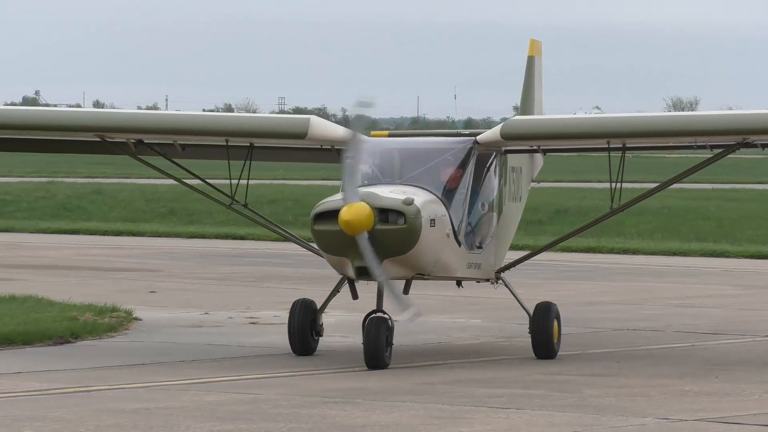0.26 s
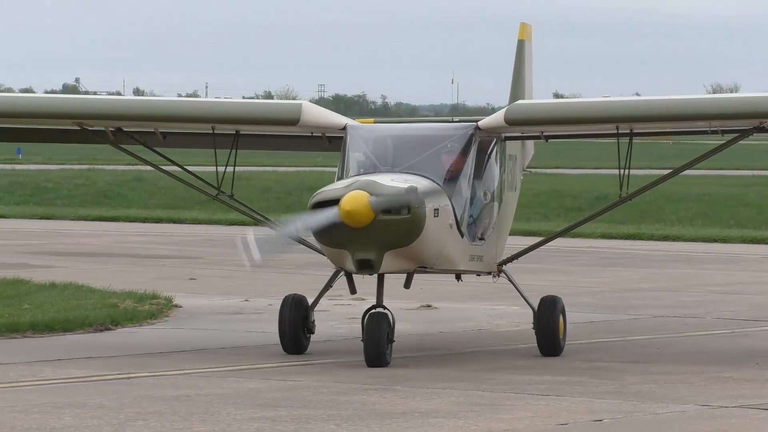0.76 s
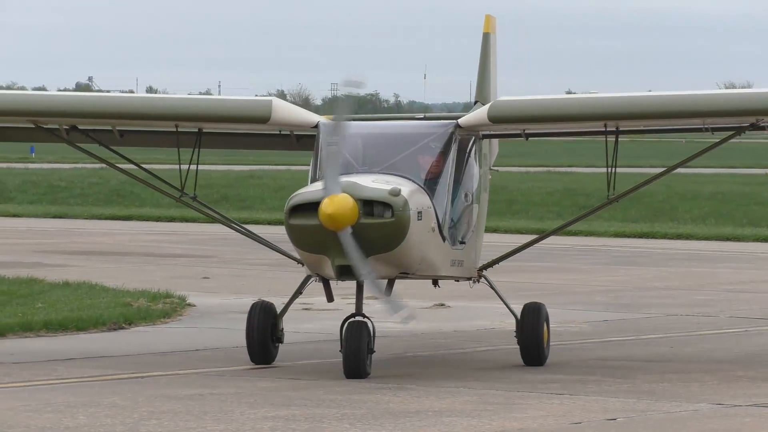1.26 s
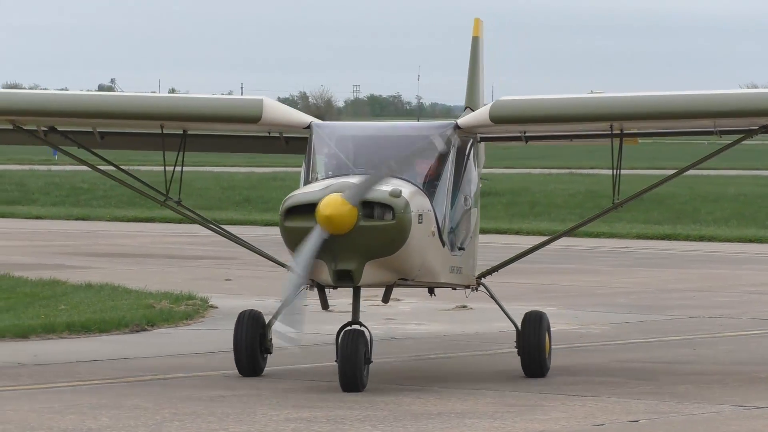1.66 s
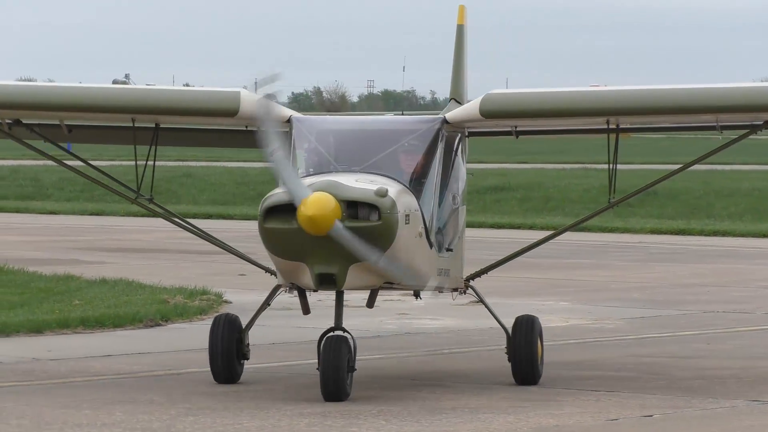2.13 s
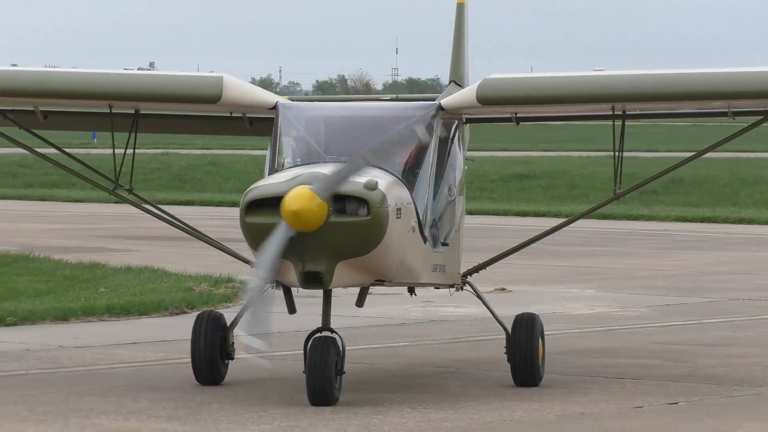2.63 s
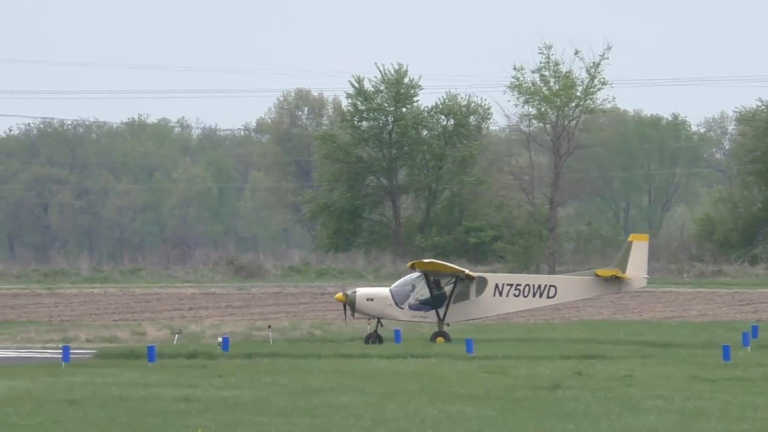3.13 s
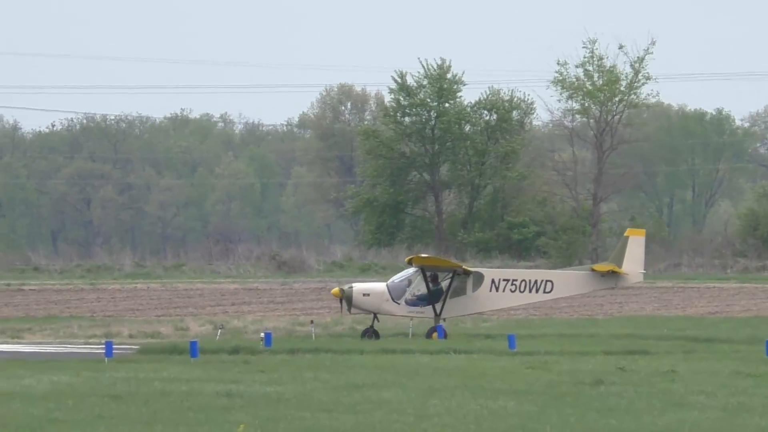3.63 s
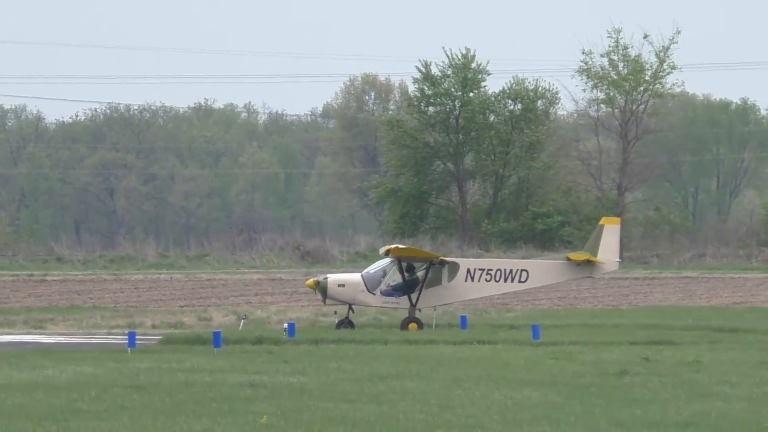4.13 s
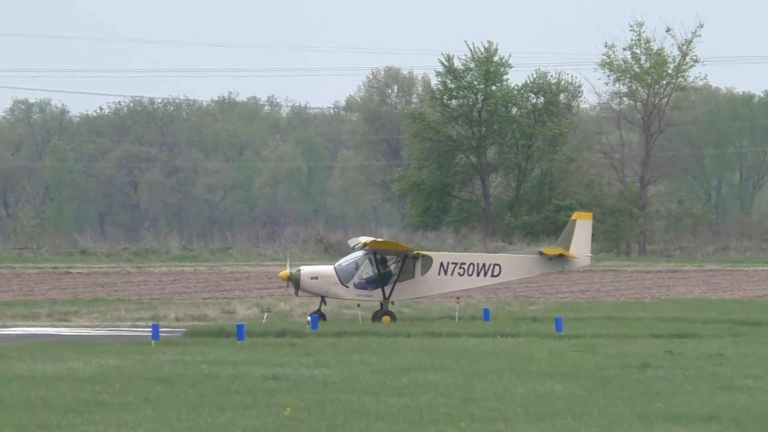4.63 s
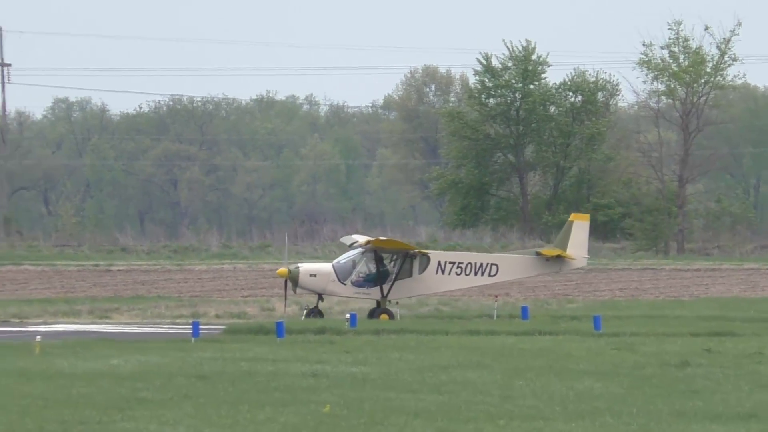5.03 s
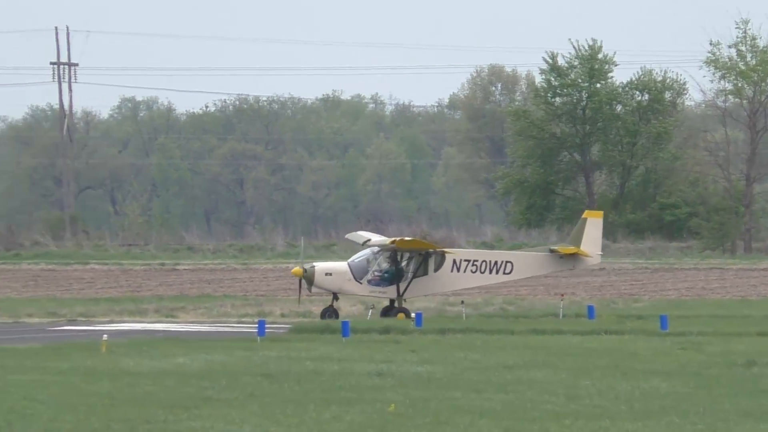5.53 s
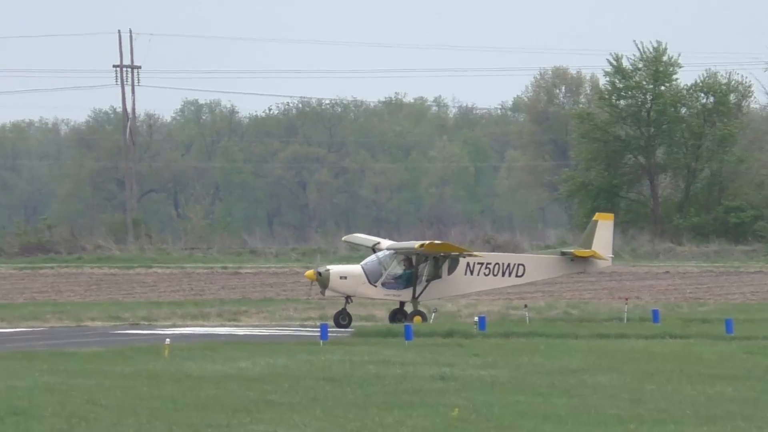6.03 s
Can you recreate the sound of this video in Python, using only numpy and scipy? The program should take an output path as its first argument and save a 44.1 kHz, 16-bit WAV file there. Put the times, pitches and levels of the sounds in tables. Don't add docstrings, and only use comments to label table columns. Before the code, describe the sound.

Close stereo pickup of a small plane's piston engine, rapid rough puffs about twenty-nine per second, with metallic clacks growing harder and a few sharp pops. A hard cut then drops to open field ambience, where the same kind of engine murmurs far away through moving air while a nearby bird whistles a short varied phrase, with other birds faintly answering among trees.

```python
import sys
import numpy as np
from scipy import signal
from scipy.fft import rfft, irfft, next_fast_len
from scipy.io import wavfile
from scipy.ndimage import uniform_filter1d, map_coordinates

SR = 44100
rng = np.random.default_rng(int(sys.argv[2]) if len(sys.argv) > 2 else 0)


def store_pcm(level_fs):
    pcm = np.round(np.clip(level_fs, -1, 1) * 32767).astype(np.int16)
    wavfile.write(sys.argv[1], SR, np.atleast_2d(pcm).T)


def voltage_ratio(decibels):
    exponent = np.asarray(decibels, float) / 20
    return 10 ** exponent


N = 276948
T = np.arange(N) / SR
CUT_S = 2.8318
CYCLE_HZ = 7.31

# frequency in Hz, level in dB per Hz.
THROB_SPECTRUM = [(15, -60), (25, -17), (55, -7.5), (105, 1.5), (160, -8.5), (200, -14.5), (232, -7.5),
                  (265, -17), (330, -19.5), (500, -24), (700, -54.5)]
ROAR_SPECTRUM = [(250, -36), (400, -10), (800, -6), (1000, -1.5), (1250, -1), (1500, -6.5), (2300, -11.5),
                 (3500, -21.5), (4800, -42)]
HISS_SPECTRUM = [(2000, 6), (4500, -1), (6500, -9.5), (10000, -1.5), (13000, 1), (15700, 0)]
# time in s, level in dB.
CARRY = [(2.83, 1), (3.0, 0.5), (3.3, 0), (3.5, -3), (3.58, -1), (3.8, -4.5), (4.0, -1), (4.35, -1),
         (4.52, 2), (5.0, 0.5), (5.6, 2), (6.28, 1.5)]
# centre in s, half length in s, rise in dB.
SURGES = [
    (2.86, 0.089, 3),
    (3.82, 0.13, 3.5),
    (4.56, 0.13, 2.2),
    (5.154, 0.21, 2.5),
    (5.702, 0.048, 2),
]
# centre in s, half length in s, frequency in Hz, level in dB.
FAR_TONES = [
    (2.95, 0.12, 987, -60.5),
    (3.2, 0.1, 990, -60),
    (4.574, 0.1, 120, -46.5),
    (4.9, 0.07, 1233, -59),
    (5.3, 0.09, 1228, -57),
    (5.475, 0.046, 1233, -54),
    (5.61, 0.091, 1233, -52.5),
    (6.05, 0.2, 1217, -64),
]
# frequency in Hz, then likeness 0-1, left-right in dB, left lead in rad.
FAR_PORTS = [
    [(60, 0.83), (130, 0.96), (290, 0.61), (640, 0.91), (1410, 0.51), (3100, 0.12), (6820, 0.63), (15000, 0.41)],
    [(60, 4), (110, -1.5), (200, 0.5), (380, -2), (700, -1), (1290, 1.5), (2380, 2), (4400, 0), (8120, 0.0), (15000, 0.0)],
    [(600, -0.14), (1400, 0.69), (2900, -0.78), (6000, -0.52)],
]
# start in s, centre in Hz, width in Hz, 60 dB decay in s, peak in dB.
TICKS = [
    (4.06, 6800, 6000, .008, -52),
    (4.45, 450, 110, .12, -45),
    (4.46, 6300, 3000, .7, -63),
]
# start in s, end in s, first Hz, last Hz, level in dB.
SONG = [
    (3.337, 3.529, 3800, 3640, -52.5),
    (3.657, 3.983, 2990, 2860, -48),
    (4.075, 4.139, 4940, 4720, -51),
    (4.174, 4.244, 5460, 5330, -56),
    (4.242, 4.279, 4090, 3920, -52),
    (4.292, 4.302, 3900, 8500, -58),
    (4.311, 4.364, 4560, 4060, -54.5),
    (4.368, 4.43, 3610, 3330, -49),
    (4.445, 4.507, 3700, 3450, -45.5),
    (4.515, 4.625, 3305, 3190, -51.5),
]
# swell in dB, glide bend, beat depth 0-1, first and last beats in Hz.
SONG_VOICES = [(19, .85, 0, 1, 1), (-6, .35, 0, 1, 1), (3, 1.2, 0, 1, 1), (-2, 1.6, .2, 90, 90),
               (-1, 1, 0, 1, 1), (-8, 1, 0, 1, 1), (-5, 1.4, .7, 130, 200), (1, .8, .75, 30, 30),
               (4, .7, 0, 1, 1), (-4, 2, .65, 25, 150)]
# frequency in Hz, left-right in dB.
MIC_SHADOW = [(2900, 8.5), (3300, 9), (3600, 11), (4000, 12), (4400, 18), (4800, 9), (5400, 8),
              (7000, 3)]
# start in s, end in s, first Hz, last Hz, level in dB.
FAINT_BIRDS = [(3.181, 3.23, 4700, 4300, -81), (3.2, 3.25, 3200, 3150, -71), (3.555, 3.68, 4150, 3830, -68),
               (3.67, 3.88, 3780, 3620, -77), (3.8, 3.853, 5950, 5950, -77), (3.862, 3.89, 5250, 5150, -73),
               (3.88, 4.024, 4860, 4860, -76), (4.11, 4.2, 4150, 4100, -73),
               (4.278, 4.383, 3310, 3390, -69), (4.591, 4.84, 3810, 3730, -72.5),
               (4.617, 4.725, 3500, 3470, -68), (4.86, 4.95, 3300, 3240, -73),
               (5.355, 5.565, 4800, 4760, -74.5), (4.47, 4.52, 5450, 5350, -76),
               (6.072, 6.09, 4900, 3280, -63), (5.692, 5.712, 6250, 6150, -72),
               (5.751, 5.863, 3800, 3540, -64), (5.774, 5.806, 3930, 4340, -64),
               (5.893, 5.93, 5450, 5300, -76), (5.96, 5.99, 5870, 5400, -71),
               (6.003, 6.05, 4850, 4540, -66), (6.09, 6.146, 4180, 3900, -71),
               (6.133, 6.29, 3860, 3780, -69), (6.23, 6.27, 4100, 4320, -69)]

# frequency in Hz, level in dB per Hz.
WASH_SPECTRUM = [(20, -120), (30, -31), (60, -22.5), (95, -20), (150, -8.5), (220, -21), (500, -27),
                 (1500, -40), (3500, -33.5), (6000, -46), (9000, -47), (15600, -60)]
JET_SPECTRUM = [(150, -120), (250, 2.5), (450, -5), (700, 3), (1100, 2), (2500, 0), (4000, -7.5),
                (5000, -21), (8000, -43)]
METAL_SPECTRUM = [(1500, -13), (3000, 3.5), (4300, 1.5), (6300, -4), (8300, 1.5), (11000, -3), (15600, -16)]
# time in ms, level in dB.
JETS = [(21, 5), (54, 0.5), (97, 2.5), (123, -4)]
# frequency in Hz, level in dB.
GEARS = [(562.6, -56), (703.9, -48.5), (844, -57.5)]
# time in ms, level in dB.
VALVES = [(21.5, 0.5), (55.5, 0.5), (89.5, -4.5), (123.5, 4)]
# time in s, peak in dB, ring in Hz.
CLACKS = [(0.2563, -24, 8200), (0.528, -29, 4100), (0.939, -25, 4250), (1.01, -27, 6900),
          (1.0779, -37, 6700), (1.4187, -28, 8500), (1.487, -24, 4060), (1.554, -17, 7040),
          (1.621, -15, 4280), (1.6906, -18, 4250), (1.7594, -18, 4260), (1.8272, -20, 4370),
          (1.8954, -19, 4130), (1.966, -20, 5900), (2.173, -23, 4400), (2.2084, -15.5, 4170),
          (2.31, -19, 4320), (2.376, -21, 8700), (2.5823, -14, 4100), (2.6514, -21, 4390),
          (2.6852, -20, 8280), (2.7204, -27, 7330)]
# time in s, peak in dB, ring in Hz.
POPS = [
    (0.977, -13, 1104),
    (1.389, -12, 1750),
    (1.621, -9.5, 1076),
    (2.209, -9, 1090),
]
# time in ms, level in dB.
KNOCKS = [(29, -6.5), (50, -8), (63, -8), (86, -14.5), (97, -11), (118, -11.5), (132, -5.5)]
# centre in Hz, width in Hz, level in dB.
COWL_MODES = [(395, 91, -0.5), (320, 26, -0.5), (446, 22, -3.5)]
# time in ms, level in dB.
PUFFS = [
    (13.3, -6.8),
    (17.4, -3.5),
    (28.9, -11.1),
    (51.4, -0.1),
    (72.0, -20.9),
    (86.8, -0.5),
    (88.4, -26.7),
    (121.2, -0.4),
]
# centre in Hz, width in Hz, level in dB.
PIPE_MODES = [(58.6, 9.0, -40.1), (97.0, 11.7, -5.4), (96.9, 9.3, -4.1), (157.0, 60.0, -30.0),
              (166.0, 47.1, -27.8)]
# centre in Hz, width in Hz, level in dB.
OUTLET_MODE = [(100.1, 40, 0)]
# time in s, lead in ms.
CRANK_LEAD = [(0.0, 3.6), (0.16, 3.5), (0.56, 5.1), (0.86, 5.0), (1.24, 2.75), (1.4, 3.2), (1.66, 6.6),
              (1.85, 6.0), (2.12, 3.6), (2.38, 3.4), (2.54, 2.6), (2.83, 2.55)]
# time in s, nearness in dB.
NEARNESS = [(0.0, -2.5), (0.55, -1.7), (1.0, 2), (1.2, -1.5), (1.6, 0.5), (2.5, 1.5), (2.83, -0.5)]
# delay in ms, left port then right.
BOUNCE_MS = [
    [3.03],
    [2.73],
]
# frequency in Hz, share 0-1 that returns in step.
BOUNCE_SHARE = [(200, .4), (600, .85), (900, .75), (1300, .65), (1800, .35), (2600, .25), (5000, .05)]
# frequency in Hz, likeness 0-1.
NEAR_ALIKE = [(35, .2), (60, .9), (90, .95), (160, .78), (250, .8), (330, .97), (700, .88), (1400, .72),
              (3000, .62), (4500, .68), (7000, .96), (11000, .9), (15000, .6)]
# frequency in Hz, left-right in dB.
NEAR_BALANCE = [(60, .4), (100, -.2), (160, -.8), (250, -.5), (400, -4), (700, -5), (1400, -5.5),
                (2500, -3.2), (4500, -.6), (15000, 0)]
# frequency in Hz, lead of left in rad.
NEAR_LEAD = [(40, -.2), (90, -.26), (160, -.3), (400, -.5), (900, -.9), (1400, 0), (2500, .15), (4500, .3),
             (8000, 0), (15000, -.2)]


def unit(x):
    return x / np.sqrt(np.mean(x ** 2) + 1e-20)


def along(points, hz):
    f, v = np.transpose(points)
    return np.interp(np.log(hz + 1), np.log(f + 1), v)


def curve(rows):
    return np.interp(T, *np.transpose(rows))


def hump(s, half):
    return np.exp(-((T - s) / half) ** 2)


def wobble(rate):
    knots = rng.standard_normal(int(N * rate / SR) + 4)
    return map_coordinates(knots, [T * rate])


def filtered(x, response):
    m = next_fast_len(x.shape[-1] + SR // 2)
    spectrum = rfft(x, m) * response(np.fft.rfftfreq(m, 1 / SR))
    return irfft(spectrum, m)[..., :x.shape[-1]]


def modes(table):
    def response(f):
        total = 0
        for k, (centre, width, db) in enumerate(table):
            damping = 1j * f * width
            total = total + (-1) ** k * voltage_ratio(db) * damping / (centre * centre - f * f + damping)
        return total
    return response


def noise(spectrum, patchy_db):
    z = signal.stft(rng.standard_normal((2, N)), nperseg=512)[2]
    field_gain = uniform_filter1d(rng.standard_normal(z.shape[1:]), 6, axis=0)
    field_gain = uniform_filter1d(field_gain, 10, axis=1)
    pair = signal.istft(z * voltage_ratio(patchy_db * unit(field_gain)), nperseg=512)[1][:, :N]
    return unit(filtered(pair, lambda hz: voltage_ratio(along(spectrum, hz))))


def stereo(pair, ports):
    alike, balance, lead = ports

    def split(hz):
        turn = np.arccos(np.clip(along(alike, hz), -1, 1)) / 2
        return np.array([np.cos(turn), np.sin(turn)])

    mid, side = filtered(pair, split)
    half = np.array([[.5], [-.5]])
    return filtered(np.array([mid + side, mid - side]),
                    lambda hz: voltage_ratio(half * along(balance, hz)) * np.exp(1j * half * along(lead, hz)))


def far_engine():
    carry_db = curve(CARRY)
    throb_db = -48.5 + 0.64 * carry_db + sum(db * hump(s, half) for s, half, db in SURGES)
    flutter = voltage_ratio(0.7 * wobble(8) + 1.3 * wobble(26))
    throb = voltage_ratio(throb_db) * unit(flutter * noise(THROB_SPECTRUM, patchy_db=0))
    roar = voltage_ratio(-55 + carry_db + 1.04 * wobble(7)) * noise(ROAR_SPECTRUM, patchy_db=1.0)
    return throb + roar


def far_tones():
    drift = 2 * np.pi * np.cumsum(9.1 * wobble(12)) / SR
    out = np.zeros(N)
    for s, half, hz, db in FAR_TONES:
        level = voltage_ratio(db + 1.5 + 2.5 * wobble(45)) * hump(s, half)
        out += level * np.sin(2 * np.pi * hz * T + drift)
    return out


def ticks():
    out, t = np.zeros(N + SR), np.arange(SR // 8) / SR
    for s, hz, width, t60, db in TICKS:
        decay = rng.standard_normal(len(t)) * voltage_ratio(-60 * t / t60)
        burst = filtered(decay, lambda f: modes([(hz, width, 0)])(f) ** 2)
        out[round(s * SR):][:len(t)] += voltage_ratio(db) * burst / np.abs(burst).max()
    return out[:N]


def whistle(note, rough_db, edge_s, voice):
    start, end, first_hz, last_hz, db = note
    swell_db, bend, depth, *beats = voice
    u = np.clip((T - start) / (end - start), 0, 1)
    hz = first_hz + (last_hz - first_hz) * u ** bend
    fade = np.clip(np.minimum(u, 1 - u) * max((end - start) / edge_s, 2), 0, 1)
    apart_hz = np.interp(u, [0, 1], beats) * (T > start)
    phase, beat = 2 * np.pi * np.cumsum([hz - apart_hz / 2, apart_hz], axis=1) / SR
    level = np.sqrt(2) * fade * voltage_ratio(db + swell_db * (u - .5) + rough_db * wobble(45))
    return level * (np.sin(phase) - depth * np.sin(phase + beat))


def birds():
    song = sum(whistle(note, 0.45, 0.023, voice) for note, voice in zip(SONG, SONG_VOICES))
    half = np.array([[.5], [-.5]])
    near = filtered(song, lambda hz: voltage_ratio(half * along(MIC_SHADOW, hz)))
    far = sum(whistle(note, 2.7, 0.011, (0.0, 1.1, 0.5, 40, 112)) for note in FAINT_BIRDS)
    t = np.arange(SR // 5) / SR
    trees = rng.standard_normal((2, len(t))) * voltage_ratio(-60 * t / .25)
    trees = trees / np.linalg.norm(trees[0])

    def echo(x):
        return signal.fftconvolve(x, trees, axes=1)[:, :N]

    return near + .85 * far + voltage_ratio(-21) * echo(near) + voltage_ratio(-10) * echo(far[None])


def field():
    hiss = voltage_ratio(-64) * noise(HISS_SPECTRUM, patchy_db=.4)
    return stereo(far_engine() + hiss, FAR_PORTS) + far_tones() + birds() + ticks()


def apron(x):
    def response(f):
        shade = np.array([1 / (1 + (f / 1500) ** 2), np.ones_like(f)])
        delay = np.exp(-2j * np.pi * f * np.array(BOUNCE_MS) / 1000)
        return 1 + shade * along(BOUNCE_SHARE, f) * delay
    return filtered(x, response)


def crank(pattern, jitter_ms, scatter_db):
    ms, db = np.transpose(pattern)
    even = (np.arange(-3, 22)[:, None] / CYCLE_HZ + ms / 1000).ravel()
    chance = rng.standard_normal((len(even), 2))
    lead_ms = np.interp(even, *np.transpose(CRANK_LEAD))
    s = even - (lead_ms + jitter_ms * chance[:, 0]) / 1000
    size = voltage_ratio(np.tile(db, len(even) // len(ms)) + scatter_db * chance[:, 1])
    return np.bincount(np.round(s * SR).astype(int) + SR // 2, size, N + SR // 2)


def swell(impulses, rise, fall):
    t = np.arange(SR // 10) / SR
    shape = (1 - np.exp(-t / rise)) * np.exp(-t / fall)
    return signal.fftconvolve(impulses, shape)[SR // 2:][:N]


def propeller_wash():
    return voltage_ratio(-29.5) * noise(WASH_SPECTRUM, patchy_db=1.5)


def gas_jets(near_db):
    flow = 1.0 + swell(crank(JETS, jitter_ms=1.5, scatter_db=1), rise=0.0027, fall=0.015)
    level = voltage_ratio(-33 - 0.4 * near_db + 0.46 * wobble(4.4))
    return level * unit(flow * noise(JET_SPECTRUM, patchy_db=1.23))


def accessory_whine():
    return sum(voltage_ratio(db + 3 + 2 * wobble(6)) * np.sin(2 * np.pi * hz * T + .5 * wobble(5)) for hz, db in GEARS)


def valve_gear(near_db):
    seat = crank(VALVES, jitter_ms=.6, scatter_db=2)
    sharp = swell(seat, rise=0.00049, fall=0.0034)
    rattle = swell(seat, rise=0.0012, fall=0.022)
    gear = (0.12 + sharp + 0.31 * rattle) * noise(METAL_SPECTRUM, patchy_db=2.5)
    return voltage_ratio(-44 + 0.87 * near_db) * unit(gear)


def clacks():
    out, t = np.zeros((2, N)), np.arange(SR // 30) / SR
    blow = (1 - np.exp(-t / 0.00076)) * np.exp(-t / 0.0045)
    for s, db, hz in [*CLACKS, *POPS]:
        def colour(f):
            metal = .7 * (hz > 3000) * voltage_ratio(along(METAL_SPECTRUM, f))
            return metal + 2.5 * modes([(hz, 800, 0)])(f) ** 2

        shake = filtered(blow * rng.standard_normal((2, len(t))), colour)
        ring = [[0.7], [0.2]] * blow * np.sin(2 * np.pi * hz * t)
        out[:, round(s * SR):][:, :len(t)] += voltage_ratio(db - 6.5) * (shake + ring)
    return out


def cowling():
    knocks = np.array([crank(KNOCKS, jitter_ms=.35, scatter_db=1.8) for _ in range(2)])
    body = modes([(385, 170, 0)])
    ring = filtered(knocks, lambda f: modes(COWL_MODES)(f) * body(f) ** 2)
    return voltage_ratio(-38 + 0.54 * wobble(5.5)) * unit(ring[:, SR // 2:])


def exhaust():
    puffs = crank(PUFFS, jitter_ms=.12, scatter_db=.5) * SR / (2 * CYCLE_HZ)
    return filtered(puffs, lambda f: modes(PIPE_MODES)(f) * modes(OUTLET_MODE)(f))[SR // 2:]


def engine():
    near_db = curve(NEARNESS)
    ports = NEAR_ALIKE, NEAR_BALANCE, NEAR_LEAD
    airborne = apron(stereo(gas_jets(near_db) + propeller_wash(), ports))
    shared = (exhaust() + accessory_whine()) * [[1], [0]]
    direct = cowling() + valve_gear(near_db) + clacks() + shared
    return airborne + stereo(direct, ports)


def scene():
    return np.where(T < CUT_S, engine(), field())


def band_limit(x):
    return signal.sosfilt(signal.butter(12, 15720, fs=SR, output="sos"), x)


def record(dry):
    mix = filtered(dry, lambda hz: hz < 15750)
    return band_limit(mix)


dry = scene()
out = record(dry)
store_pcm(out)
```